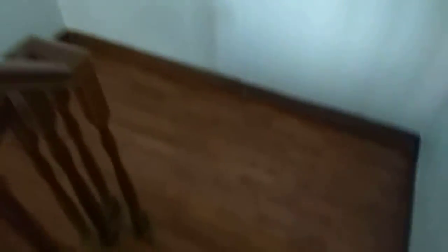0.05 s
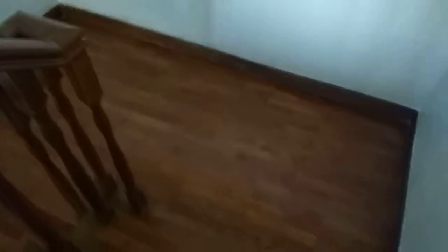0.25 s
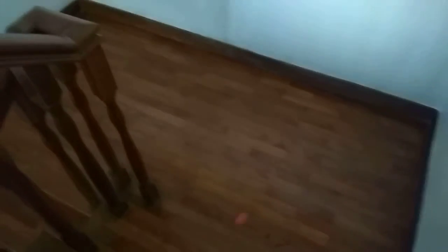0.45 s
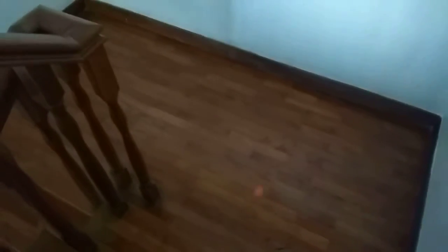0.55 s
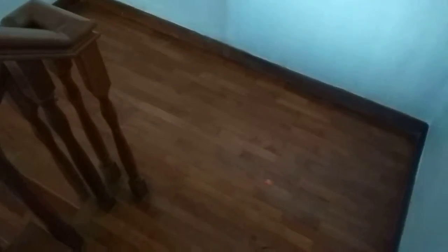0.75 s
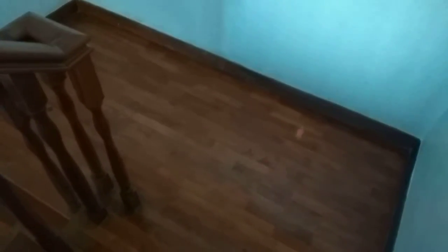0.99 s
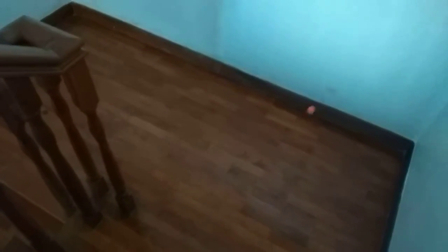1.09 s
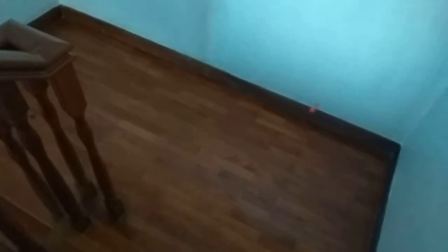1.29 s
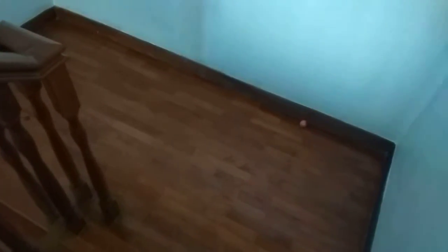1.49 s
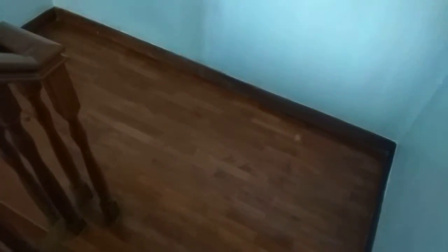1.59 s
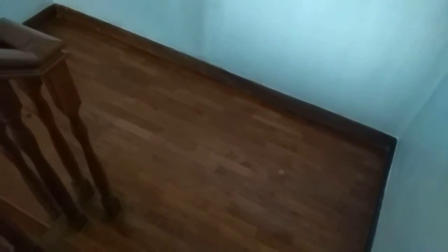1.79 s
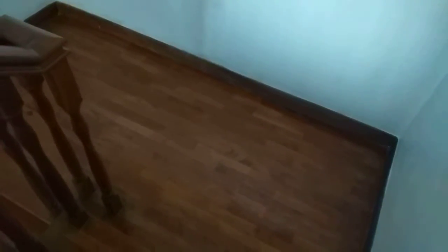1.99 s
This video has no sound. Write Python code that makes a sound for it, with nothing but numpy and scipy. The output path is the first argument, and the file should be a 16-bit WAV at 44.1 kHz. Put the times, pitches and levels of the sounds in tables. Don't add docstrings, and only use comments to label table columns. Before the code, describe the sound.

A small hard ball bounces with sharp, hollow knocks on wood in an echoing stairwell.

```python
import sys
import numpy as np
from scipy import signal
from scipy.fft import rfft, irfft, next_fast_len
from scipy.io import wavfile
from scipy.ndimage import uniform_filter1d

SR = 44100
rng = np.random.default_rng(int(sys.argv[2]) if len(sys.argv) > 2 else 0)


def put_to_file(sound):
    columns = np.atleast_2d(sound).T
    safe = np.clip(columns, -1, 1)
    whole_steps = np.round(safe * 32767)
    wavfile.write(sys.argv[1], SR, whole_steps.astype(np.int16))


def natural_amplitude(level_db):
    exponent = np.asarray(level_db, float) / 20
    return 10 ** exponent


N = 90404
LEAD = SR // 4


def evened(x):
    return x / np.sqrt(np.mean(x ** 2) + 1e-20)


def read(points, hz):
    f, value = np.transpose(points)
    return np.interp(np.log(hz + 1), np.log(f + 1), value)


def add(mix, start_s, sound):
    part = mix[round(start_s * SR) + LEAD:][:len(sound)]
    part += sound[:len(part)]


def colour(x, gain_db):
    size = next_fast_len(x.shape[-1])
    gain = natural_amplitude(gain_db(np.fft.rfftfreq(size, 1 / SR)))
    return irfft(rfft(x, size) * gain, size)[..., :x.shape[-1]]


def ring(modes, t):
    return sum(natural_amplitude(db - 60 * t / t60) * np.sin(2 * np.pi * hz * t) for hz, db, t60 in modes)


def stereo_noise(shape, length):
    # frequency in Hz, likeness of left and right (1 = the same).
    likeness = [(60, .99), (250, .96), (550, .8), (900, .3), (1500, .05), (15000, 0)]
    frames, hz = length // 128 + 5, np.fft.rfftfreq(512, 1 / SR)
    a, b, c, d = rng.standard_normal((frames, 257, 4)).T
    same = np.clip(read(likeness, hz), 0, .995)[:, None]
    left = a + 1j * b
    right = same * left + np.sqrt(1 - same ** 2) * (c + 1j * d)
    spectra = np.array([left, right]) * shape(hz[:, None], np.arange(frames) * 128 / SR)
    return signal.istft(spectra, nperseg=512, noverlap=384)[1][:, :length]


def knock(db, surface):
    wood_modes = {"tread": [(157.6, -8.5, 0.073), (219, -11, 0.094), (311, -5, 0.087), (456.3, -3, 0.12),
                  (532.2, -0.5, 0.21), (575, -7, 0.16), (657, -22, 0.068), (857, -9, 0.043),
                  (943, -20.5, 0.11), (1235, -20, 0.038)], "skirting": [(212, -20, 0.037),
                  (398, 2.5, 0.023), (510, -15, 0.071), (793, -9, 0.056), (1020, -7.5, 0.034),
                  (1160, -6.5, 0.021), (1390, -15, 0.028)], "floor": [(159, -20, 0.023), (253.5, 3, 0.05),
                  (356, -8, 0.032), (423, -5.5, 0.068)]}
    knock_rise = {"tread": 0.0033, "skirting": 0.00062, "floor": 0.0017}
    t = np.arange(SR // 2) / SR
    rise = np.minimum(t / knock_rise[surface], 1)
    return -natural_amplitude(db + 3.5) * rise * ring(wood_modes[surface], t)


def stairwell_air(db, surface):
    air_modes = {"tread": [(141.4, -15, 1.3), (190.4, -9, 0.75), (251.6, -0.5, 1.4), (264, 2, 0.79),
                 (348.7, -6, 1.4), (401.7, -5.5, 1.72), (428.7, 1.5, 1.23), (421.5, -15, 1.2),
                 (497, -0.5, 1.25), (529.8, -5.5, 1.1), (564, -9, 1.1), (551, 3.5, .8), (570, -25, 0.46),
                 (864, -12, 0.42)], "skirting": [(144.3, -6.5, 0.91), (262.7, 6.5, 0.38), (287, -5, 0.49),
                 (331, -4.5, 1.5), (346.3, -1, 0.53), (360.6, -5.5, 1.3), (403.5, -2.5, 1.04),
                 (457, -9.5, 0.59), (495, -5.5, 0.86), (756, -32, .7)], "floor": [(147.77, -14.5, 0.79),
                 (243.9, -9, 2.06), (256.8, -20, 1.7), (339.4, -1.5, 1.7), (430, -9.5, 0.82)]}
    air_level = {"tread": -13.5, "skirting": -11, "floor": -8}
    air_rise = {"tread": 0.062, "skirting": 0.08, "floor": 0.048}
    t = np.arange(2 * SR) / SR
    rise = 1 - np.exp(-t / air_rise[surface])
    return natural_amplitude(db + air_level[surface]) * rise * ring(air_modes[surface], t)


def contact(crack_db, tick_db, tick_hz, surface):
    crack_colour = {"tread": [(700, -40), (1200, 4), (2200, 5), (3500, -5.5), (5000, -3), (7000, -11),
                    (11000, -16.5), (15000, -11)], "skirting": [(700, -18), (1100, -17), (2000, 6.5),
                    (3500, -2.5), (5000, -11), (8000, -15), (12000, -6.5), (15500, -11.5)],
                    "floor": [(700, -1.5), (1500, -10), (4000, -14), (6500, -12.5), (10000, -15),
                    (15000, -7)]}
    crack_t60, tick_t60, tick_width_hz = 0.025, 0.014, 1500
    t = np.arange(2048) / SR

    def wide(f):
        return read(crack_colour[surface], f) - 40 * (f < 500)

    def high(f):
        return -24 * np.log10(1 + ((f - tick_hz) / tick_width_hz * 1.14) ** 2)

    crack_noise, tick_noise = rng.standard_normal((2, 2048))
    burst = evened(colour(crack_noise, wide)) * natural_amplitude(crack_db + 9.5 - 60 * t / crack_t60)
    burst += evened(colour(tick_noise, high)) * natural_amplitude(tick_db - 1.5 - 60 * t / tick_t60)
    click = 1. * (np.arange(2048) == 128)
    crack_click = evened(colour(click, wide))
    tick_click = evened(colour(click, high))
    burst += np.roll(tick_click, -70) * natural_amplitude(tick_db - 29)
    sent = crack_click * natural_amplitude(crack_db - 5) + tick_click * natural_amplitude(tick_db - 22)
    return burst * np.minimum(t / 0.00066, 1), sent


def echoes(x):
    # delay in seconds, level in dB.
    reflections = [(.0042, -7), (.0078, -8), (.013, -11), (.021, -12), (.029, -7)]
    taps = np.zeros((2, 2048))
    taps[:, 0] = 1
    for k, (s, db) in enumerate(reflections):
        near, far = k % 2, 1 - k % 2
        taps[near, round(s * SR)] = natural_amplitude(db)
        taps[far, round(s * SR) + 9] = -natural_amplitude(db - 4)
    return signal.fftconvolve(x[None], taps, axes=1)[:, :len(x)]


def hall(x):
    # frequency in Hz, t60 in seconds.
    hall_decay = [(150, 1.38), (500, 0.98), (1000, 1.28), (2500, 1.49), (6000, 0.8), (12000, 0.57)]
    tail = stereo_noise(lambda f, t: natural_amplitude(-60 * t / read(hall_decay, f)), 2 * SR)
    tail = tail * np.clip(np.arange(2 * SR) / SR / 0.0083 - .15, 0, 1)
    return signal.fftconvolve(x[None], tail / np.linalg.norm(tail[0]), axes=1)[:, :len(x)]


def house_hum():
    # frequency in Hz, level in dB per Hz.
    hum_colour = [(24, -16), (40, -6.5), (65, -13), (152, -12.5), (178, -19.5), (246, -16), (464, -24),
                  (1000, -30), (1300, -70), (2200, -120)]
    # frequency in Hz, width in Hz, height in dB.
    resonances = [(81, 22.6, 8), (151.3, 4, 10), (262, 83, 5.5), (327, 8.3, 7), (684, 75, -9)]

    def shape(f):
        peaks = sum(db / (1 + ((f - hz) / width * 2) ** 2) for hz, width, db in resonances)
        return read(hum_colour, f) + peaks

    noise = stereo_noise(lambda f, t: 1 + 0 * f * t, N)
    return natural_amplitude(-53.5) * evened(colour(noise, shape))


def hiss():
    # frequency in Hz, level in dB per Hz.
    hiss_colour = [(470, -43), (800, -2), (989, -4.5), (1210, -5), (3240, -15), (3530, -18), (6430, -23.5),
                   (11100, -21.5), (15800, -30.5)]
    noise = stereo_noise(lambda f, t: 1 + 0 * f * t, N)
    return natural_amplitude(-67) * evened(colour(noise, lambda f: read(hiss_colour, f)))


def rumble():
    # time in seconds, level in dB.
    rumble_level = [(0.0, -58.5), (0.04, -56), (0.39, -57), (0.64, -57.5), (0.66, -60), (1.4, -47.5),
                    (1.86, -57.5), (2.0, -49.5), (2.05, -65)]
    centre_hz, width_hz = 27.1, 4.3
    t, db = np.transpose(rumble_level)
    noise = rng.standard_normal(N)
    low = colour(noise, lambda f: -20 * np.log10(1 + ((f - centre_hz) / width_hz * 2) ** 2))
    flat = low / np.sqrt(uniform_filter1d(low ** 2, 5000) + 0.43 * np.mean(low ** 2))
    return evened(flat) * natural_amplitude(np.interp(np.arange(N) / SR, t, db))


def squeak(length_s, first_hz, last_hz, db):
    count = round(length_s * SR)
    smoothing = int(SR / (.035 * first_hz))
    a, b = uniform_filter1d(rng.standard_normal((2, SR // 2)), smoothing)[:, :count]
    tone = np.exp(2j * np.pi * np.cumsum(np.linspace(first_hz, last_hz, count)) / SR)
    waver = 1.3 + evened(a) + 1j * evened(b)
    return natural_amplitude(db) * evened((tone * waver).real) * np.sqrt(np.hanning(count))


def scene():
    # start in seconds, wood knock in dB, contact crack in dB, ball tick in dB, tick in Hz.
    bounces = [
        (-.12, -38.5, -44, -36.5, 10100),
        (0.146, -28.5, -50.5, -46, 9650),
        (0.4234, -47.5, -66, -52.5, 12600),
        (0.937, -45.5, -66, -55, 12900),
        (1.4541, -32, -54, -48, 10600),
        (1.8326, -49, -68.5, -53.5, 9960),
    ]
    surfaces = ["floor", "tread", "floor", "floor", "skirting", "floor"]
    # start in seconds, length in seconds, first Hz, last Hz, level in dB.
    squeaks = [
        (.33, .4, 1700, 1685, -75),
        (1.395, .055, 3400, 3560, -79),
        (1.66, .06, 2250, 2300, -74),
        (1.71, .09, 2450, 2520, -76),
        (1.75, .12, 3300, 3200, -80),
        (1.63, .29, 370, 330, -51),
    ]
    wood, bursts, sent, air, stairs = np.zeros((5, N + LEAD))
    for (s, knock_db, *touch), surface in zip(bounces, surfaces):
        burst, click = contact(*touch, surface)
        add(wood, s, knock(knock_db, surface))
        add(air, s, stairwell_air(knock_db, surface))
        add(bursts, s + 0.00031, burst)
        add(sent, s, click)
    for s, *glide in squeaks:
        add(stairs, s, squeak(*glide))
    ball = wood + air + echoes(bursts) + hall(natural_amplitude(-1.5) * wood + sent)
    return (ball + stairs)[:, LEAD:] + house_hum() + hiss() + rumble()


def roll_off(x):
    return signal.sosfilt(signal.butter(12, 16100, fs=SR, output="sos"), x)


def record(dry):
    # frequency in Hz, left minus right in dB.
    lean = [(60, 1.5), (130, -2), (290, 1), (640, -1.5), (1410, 7), (3100, 9), (6820, -1), (15000, 2.5)]
    lag = round(.0002 * SR)
    low = colour(dry[0], lambda f: -10 * np.log10(1 + (f / 1500) ** 4))
    late_low = np.concatenate([low[:lag], low[:-lag]])
    left = dry[0] - low + late_low

    def edge(f):
        return -60 * np.clip((f - 16000) / 300, 0, 1)

    left = colour(left, lambda f: edge(f) + read(lean, f) / 2)
    right = colour(dry[1], lambda f: edge(f) - read(lean, f) / 2)
    return roll_off(np.array([left, right]))


dry = scene()
out = record(dry)
put_to_file(out)
```